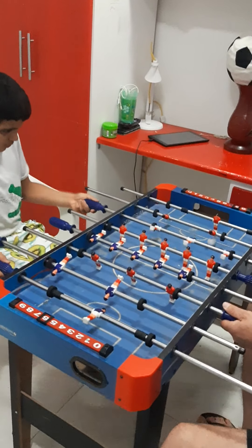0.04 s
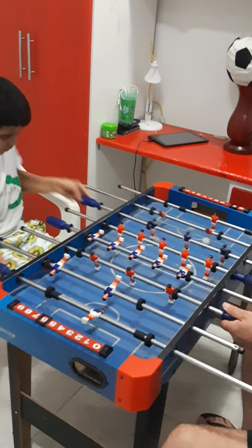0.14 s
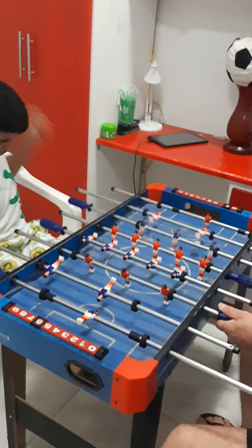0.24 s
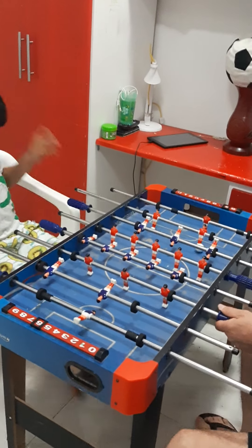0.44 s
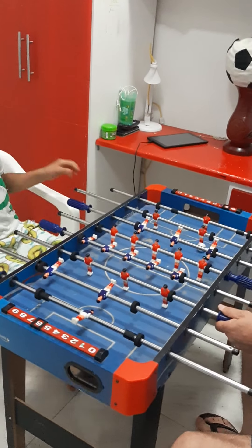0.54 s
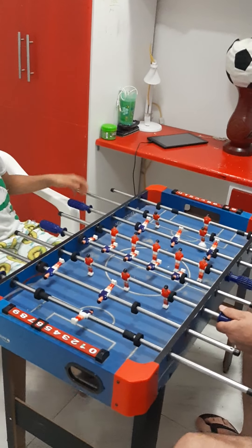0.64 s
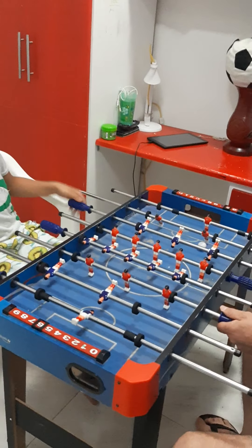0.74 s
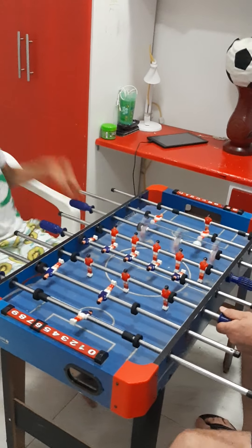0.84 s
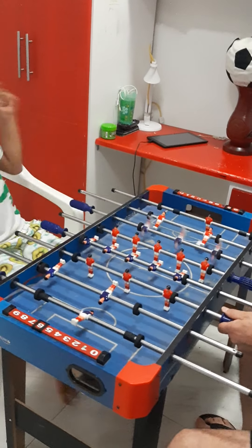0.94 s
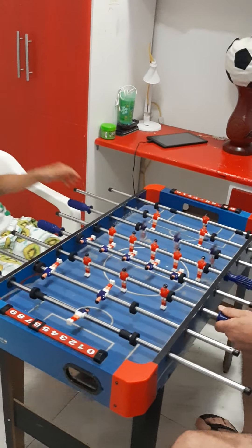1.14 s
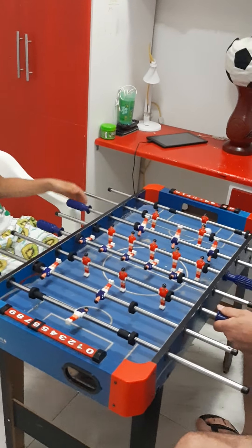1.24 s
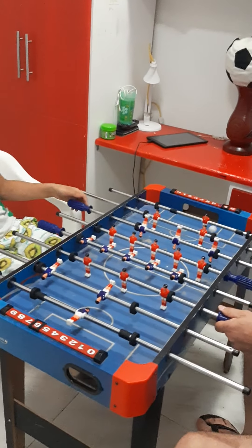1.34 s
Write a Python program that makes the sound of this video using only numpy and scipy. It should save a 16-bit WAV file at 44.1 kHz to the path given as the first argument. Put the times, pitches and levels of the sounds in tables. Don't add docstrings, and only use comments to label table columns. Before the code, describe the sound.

Foosball rods spun hard, plastic men cracking and thin box thudding, rods rattling, close up

```python
import sys
import numpy as np
from scipy import signal
from scipy.fft import rfft, irfft, next_fast_len
from scipy.io import wavfile
from scipy.ndimage import map_coordinates

SR = 44100
rng = np.random.default_rng(int(sys.argv[2]) if len(sys.argv) > 2 else 0)


def dump_mix(stems):
    frames = np.atleast_2d(stems).T
    limited = np.clip(frames, -1, 1)
    pcm = np.round(limited * 32767).astype(np.int16)
    wavfile.write(sys.argv[1], SR, pcm)


def boost(x):
    u = np.asarray(x, float) / 20
    return 10 ** u


N = 61739
TOP_HZ = 16600


def unit(x):
    return x / np.sqrt(np.mean(x ** 2) + 1e-20)


def along(points, hz):
    f, value = np.transpose(points)
    return np.interp(np.log(hz + 1), np.log(f + 1), value)


def filtered(x, response):
    m = next_fast_len(x.shape[-1] + 8192)
    spectrum = rfft(x, m) * response(np.fft.rfftfreq(m, 1 / SR))
    return irfft(spectrum, m)[..., :x.shape[-1]]


def wobble(rate):
    knots = rng.standard_normal(int(N * rate / SR) + 4)
    return map_coordinates(knots, [np.arange(N) * rate / SR])


# f/Hz, correlation
LIKENESS = [(40, .93), (150, 0.95), (330, 0.9), (550, 0.25), (3000, -0.0071), (12000, -0.12)]


def spread(pair):
    def mid_side(hz):
        turn = np.arccos(np.clip(along(LIKENESS, hz), -1, 1)) / 2
        return np.array([np.cos(turn), np.sin(turn)])

    mid, side = filtered(pair, mid_side)
    return np.array([mid + side, mid - side])


# f/Hz, level/dB per Hz
AIR = [(30, -26.5), (60, -18), (110, -8), (290, -5.5), (600, -19), (2200, -28.5), (7000, -46.5),
       (16000, -47.5)]


def room_floor():
    noise = spread(rng.standard_normal((2, N)))
    air = unit(filtered(noise, lambda f: boost(along(AIR, f))))
    hum_hz, hum_db = 58.5, -54.5 + 2.5 * wobble(9.27)
    hum = boost(hum_db) * np.sin(2 * np.pi * hum_hz * np.arange(N) / SR)
    return boost(-46) * air + hum * np.sqrt(2)


# t/s, rubbing level/dB
STROKES = [
    [(0.0, -41), (0.052, -49), (0.07, -49.5), (0.08, -52), (0.152, -81), (0.16, -37.5)],
    [(0.56, -77), (0.588, -62), (0.696, -55.5), (0.742, -78), (0.83, -68.5)],
    [(1.14, -44), (1.178, -47.5), (1.228, -39.5), (1.292, -42), (1.4, -58)],
]
# f/Hz, level/dB per Hz
RUB = [(300, -8.5), (600, -6), (1500, -16.5), (2500, -21.5), (5000, -21.5), (8000, -25), (12000, -28),
       (16000, -23.5)]


def sliding_rods():
    rattle_per_s, rattle_db, fade_s = 600, 3, .03
    t, level = np.arange(N) / SR, np.zeros(N)
    for stroke in STROKES:
        s, db = np.transpose(stroke)
        outside = np.maximum(np.maximum(s[0] - t, t - s[-1]), 0)
        level += boost(np.interp(t, s, db)) * np.exp(-(outside / fade_s) ** 2)
    grain = boost(rattle_db * wobble(rattle_per_s)) * rng.standard_normal((2, N))
    rub = filtered(spread(grain), lambda f: boost(along(RUB, f)) * (f > 250))
    return level * unit(rub)


# f/Hz, t60/s
ROOM = [(150, 0.43), (600, 0.47), (2500, 0.38), (6000, 0.41), (12000, 0.31)]


def room_answer():
    gap_s, rise_s = .0015, .003
    noise = spread(rng.standard_normal((2, SR // 2)))
    hz, t, z = signal.stft(noise, SR, nperseg=256)
    decay = boost(-60 * t / along(ROOM, hz)[:, None])
    tail = signal.istft(z * decay, SR, nperseg=256)[1]
    age = np.maximum(np.arange(tail.shape[1]) / SR - gap_s, 0)
    tail = tail * (1 - np.exp(-age / rise_s))
    return tail / np.linalg.norm(tail[0])


def add_blow(out, s, x, pan_db, room_db):
    bounce_s, bounce_db, left_lag_s = .00165, -1.5, .00003

    def direct(f):
        bounce = 1 - boost(bounce_db) * np.exp(-2j * np.pi * f * bounce_s)
        left = boost(pan_db / 2) * np.exp(-2j * np.pi * f * left_lag_s)
        right = boost(-pan_db / 2) + 0 * f
        return bounce * np.array([left, right])

    wet = signal.fftconvolve(x[None], room_answer(), axes=1) * boost(room_db)
    wet[:, :len(x)] += filtered(x, direct)
    part = out[:, max(round(s * SR), 0):][:, :wet.shape[1]]
    part += wet[:, :part.shape[1]]


def burst(length_s, band_hz=700):
    f = np.fft.rfftfreq(SR // 20, 1 / SR)
    delay = length_s * np.interp(f / band_hz, np.arange(100), rng.random(100))
    phase = 2 * np.pi * np.cumsum(delay) * f[1]
    return irfft(np.exp(-1j * phase), SR // 20)


def peaks(table):
    def response(f):
        total = 0
        for k, (centre, width, db) in enumerate(table):
            damping = 1j * f * width
            total = total + (-1) ** k * boost(db) * damping / (centre * centre - f * f + damping)
        return total

    return response


# t/s, level/dB, hardness/dB, pitch of the struck panel f/Hz
KNOCKS = [(0.021, -26, -18, 280), (.108, -28, 3.5, 304), (.188, -14.5, -0.5, 190), (.219, -14, 1, 193),
          (.243, -13.5, -17, 200), (0.277, -17, 2, 199.3), (.309, -7.5, 2.5, 198.4), (.336, -12, 12.5, 245),
          (.361, -10.5, 8.5, 285), (.368, -10.5, 10, 261), (.378, -13.5, 6, 300), (.408, -19, 13, 375),
          (.442, -12.5, -5, 207), (.472, -20.5, -11, 181.1), (.506, -24.5, -14, 180),
          (0.659, -36, -14, 180), (.851, -28.5, 5, 244), (0.935, -12.5, -0.5, 198),
          (0.9914, -10.5, 12.5, 314), (1.027, -19, 8, 340), (1.070, -17.5, 4.5, 315),
          (1.108, -17.5, -14.5, 432), (1.148, -33, 9.5, 416), (1.21, -25.5, 1, 292),
          (1.256, -27.5, -4, 470)]
# f/Hz, level/dB, t60/s
BOX = [(144, -4.5, 0.074), (183.4, -16.5, 0.58), (201.9, -4.5, 0.08), (239.7, -2, 0.069), (285, -3, 0.086),
       (331.5, -5, 0.089), (383, 0.5, 0.071), (428.3, -3.5, 0.081), (479.3, -5, 0.14)]
# f/Hz, width/Hz, level/dB
WALL = [(646, 242, -2.5), (853, 160, -1), (1170, 250, -4), (1364, 193, 0), (1678, 590, -8),
        (2020, 83, -0.5), (3170, 2700, -12.5)]


def box_knocks():
    boom_db, boom_rise_s, wall_db, tap_s = -7.5, .003, 19.5, .0023
    scatter_db, focus_db_per_octave = 2, 16.5
    bass_cut_hz, wood_top_hz = 93, 4560
    out, t = np.zeros((2, N)), np.arange(SR // 3) / SR
    for s, db, hard_db, panel_hz in KNOCKS:
        boom = np.zeros(len(t))
        for hz, mode_db, t60 in BOX:
            mode_db = mode_db + scatter_db * rng.standard_normal()
            mode_db -= focus_db_per_octave * abs(np.log2(hz / panel_hz))
            boom += boost(mode_db - 60 * t / t60) * np.sin(2 * np.pi * hz * t)
        x = boost(boom_db) * boom * (1 - np.exp(-t / boom_rise_s))
        x[:SR // 20] += boost(wall_db + hard_db) * filtered(burst(tap_s), peaks(WALL))
        add_blow(out, s, boost(db) * x, pan_db=-1.5, room_db=6)

    def wood(f):
        return (1j * f / (bass_cut_hz + 1j * f)) ** 3 / (1 + 1j * f / wood_top_hz) ** 2

    return filtered(out, wood)


# t/s, level/dB, rod ring level/dB, upper shell mode level/dB, left-right level/dB
TICKS = [
    (.0785, -37.5, -10, -1.5, -13),
    (.161, -40.5, -9.5, -8, -4),
    (.172, -32.5, 0, 5.5, -10),
    (.2175, -33, -6.5, -1.5, -17),
    (.337, -22, -7.5, -1, 3.5),
    (.362, -24, -10.5, -6.5, -1.5),
    (.8460, -37.5, -2, 0, -11),
    (1.2115, -50, -16, -3, -7),
]
KICKS = [
    (.2560, -14, -36, -3, -13),
    (.8792, -16.5, -11.5, 0, -5.5),
]
SLAMS = [
    (.3066, -5.5, 0.65, 4.5, -9),
    (.9200, -4, 1.2, 1, -1),
]
# f/Hz, width/Hz, level/dB
BUSH = [(1500, 300, -1), (2600, 500, -5), (3700, 900, -9), (5050, 350, 0), (6500, 1500, -14),
        (13500, 3000, -16)]
BALL = [(1590, 1000, -8.5), (2450, 750, -3.5), (3590, 320, 1), (4070, 520, -3.5), (5155, 400, -1),
        (7070, 1500, -11.5), (13470, 5100, -33.5)]
BUMPER = [(2037, 2230, -10.5), (3496, 460, 0), (4500, 450, -5), (5020, 350, -4.5), (6000, 1100, -9.5),
          (7884, 180, -6.5), (14500, 3500, -14.5)]


def plastic_clacks():
    contact_s, clack_db, click_db = .0014, -5, -27
    rod_hz, rod_width_hz, rod_db = 11316, 160, -1.5
    out = np.zeros((2, N))
    for hits, modes, room_db in [(TICKS, BUSH, 14), (KICKS, BALL, 10), (SLAMS, BUMPER, 8.5)]:
        for s, db, ring_db, upper_db, pan_db in hits:
            shell = [(hz, width, level + upper_db * (4200 < hz < 5600)) for hz, width, level in modes]
            body = peaks(shell + [(rod_hz, rod_width_hz, rod_db + ring_db)])
            x = filtered(burst(contact_s), lambda f: body(f) + boost(click_db) * 1j * f / (1500 + 1j * f))
            x = x / np.linalg.norm(x) * np.sqrt(contact_s * SR)
            add_blow(out, s, boost(db + clack_db) * x, pan_db, room_db)
    return out


def scene():
    return room_floor() + sliding_rods() + box_knocks() + plastic_clacks()


# f/Hz, level/dB
MIC = [(7000, -0.5), (8800, -1), (10300, 3.5), (11350, 3), (12400, 2), (15600, -5), (16000, -29)]
# f/Hz, left-right level/dB
PORTS = [(300, 0), (700, 1.5), (2500, -0.5), (5000, -3.5), (10000, -2), (14000, 6)]


def microphones(dry):
    def port(hz):
        colour_db = along(MIC, hz) + np.outer([.5, -.5], along(PORTS, hz))
        return boost(colour_db) * (hz < TOP_HZ)

    near = filtered(dry, port)
    near = near / (1 + np.abs(near / .9) ** 4) ** (1 / 4)
    return filtered(near, lambda hz: hz < TOP_HZ)


def top_cut(x):
    return signal.sosfilt(signal.butter(12, 16810, fs=SR, output="sos"), x)


def record(dry):
    return top_cut(microphones(dry))


dry = scene()
out = record(dry)
dump_mix(out)
```